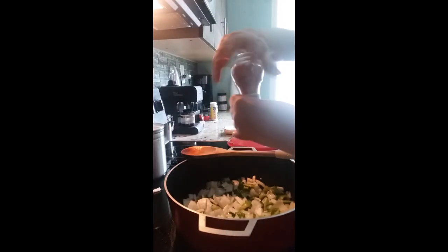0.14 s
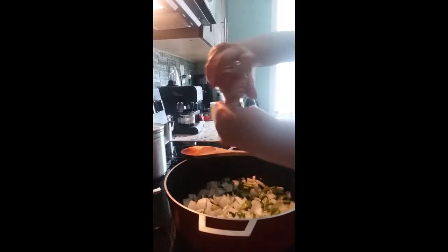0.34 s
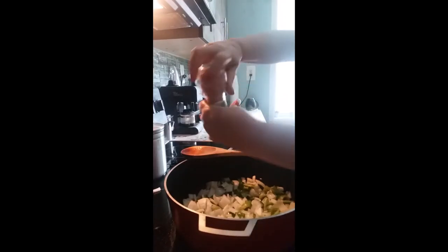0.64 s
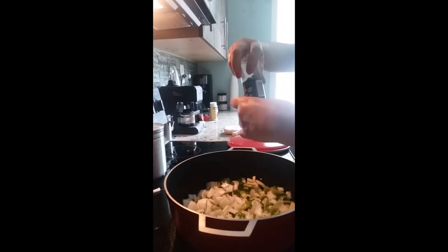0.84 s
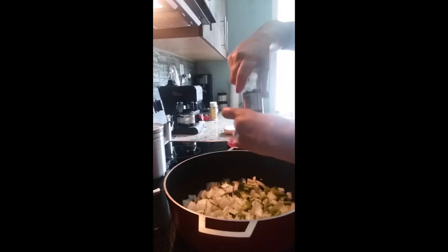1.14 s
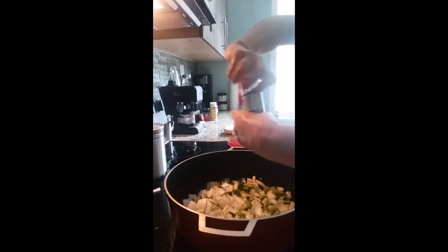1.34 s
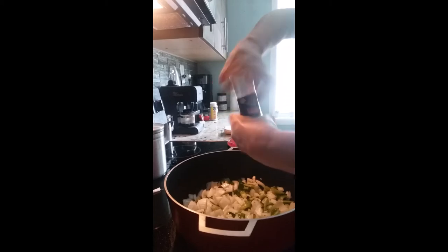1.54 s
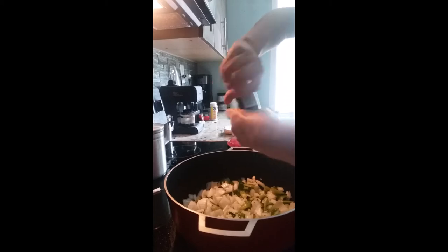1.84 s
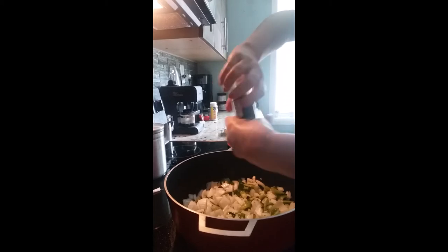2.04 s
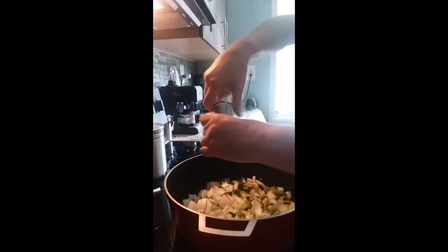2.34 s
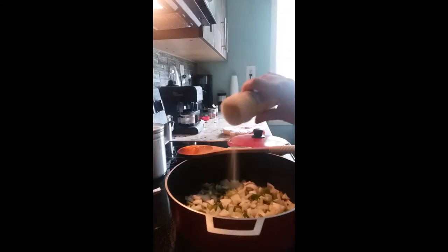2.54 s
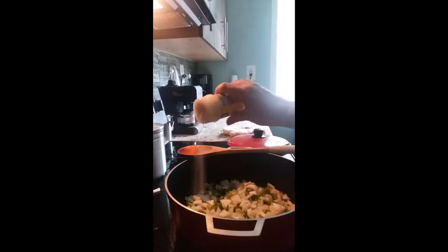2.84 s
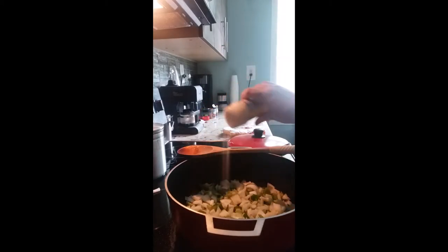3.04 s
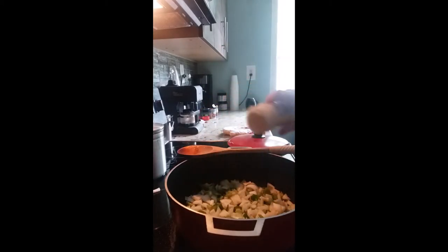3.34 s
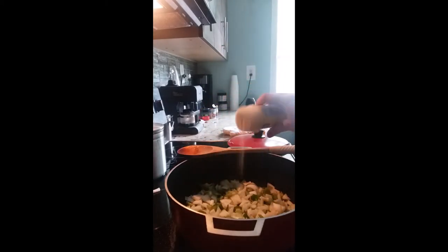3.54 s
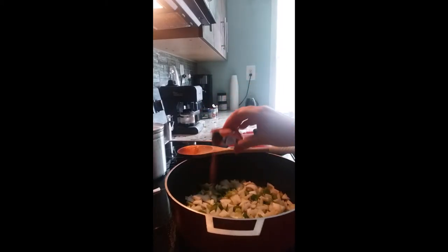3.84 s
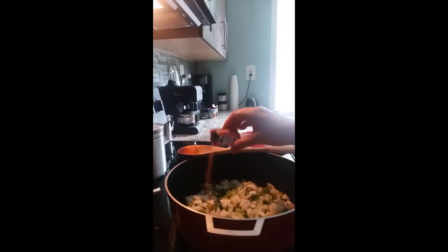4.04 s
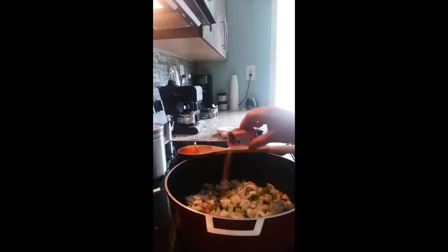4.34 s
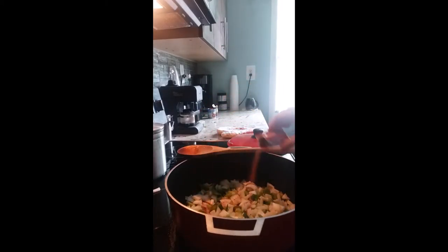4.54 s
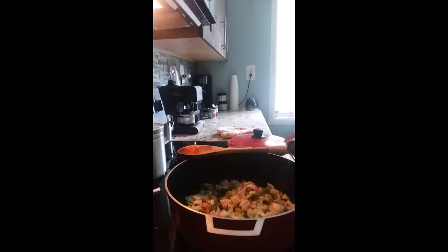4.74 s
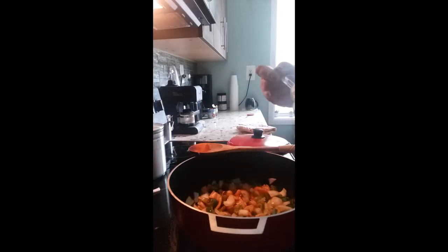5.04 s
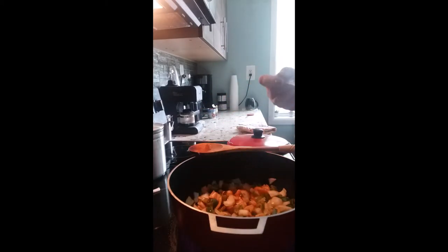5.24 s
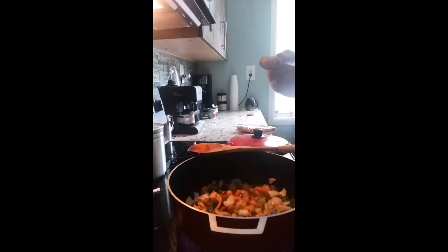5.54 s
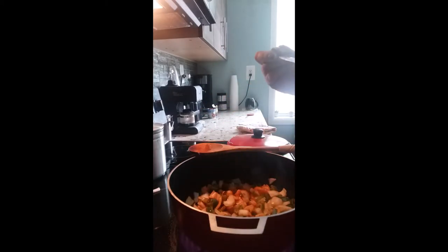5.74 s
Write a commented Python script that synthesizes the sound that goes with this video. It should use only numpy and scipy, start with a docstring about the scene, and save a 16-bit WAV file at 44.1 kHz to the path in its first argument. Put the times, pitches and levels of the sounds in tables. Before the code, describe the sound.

A home kitchen is heard from near the stove, with a low room rumble, an extractor fan's steady hum and a soft sizzle throughout. From the start to about 0.75 seconds, a salt mill makes five quick, dry, gritty twists. From 1.1 to 2.4 seconds, a louder pepper mill makes seven turns, seeds crunching and cracking sharply in its hollow body, with a slight room echo. Loose seeds rustle faintly between the later turns, and there is a small hollow knock near 1.9 seconds. At 2.5 seconds the grinding is over and the sizzle, hum and rumble rise. Little pops of fat tick through the frying, thickest between 3.1 and 3.6 seconds. At 5 seconds the sizzle turns faint and a deeper motor drones until the end, near 6 seconds. The whole sound dips very briefly at about 0.8, 2.5, 3.8 and 5 seconds.

```python
"""Spices are added to a pot in a home kitchen, in five shots joined by short fades.
Room rumble, an extractor fan's hum and a soft sizzle run throughout. A hand mill is twisted at once,
a second, louder one from 1.1 s: seeds crunch and crack under the burr and ring the hollow body.
From 2.5 s the mills rest and the pot sizzles louder, with bubbles of fat popping.
At 5 s the sizzle drops back and a deeper motor drones."""
import sys
import numpy as np
from scipy import signal
from scipy.io import wavfile
from scipy.ndimage import uniform_filter1d

SR = 44100
rng = np.random.default_rng(int(sys.argv[2]) if len(sys.argv) > 2 else 0)


def dump_mix(stems):
    """Bounce the given channels to the path in sys.argv[1] as a 16-bit WAV at rate SR."""
    frames = np.atleast_2d(stems).T  # one column per channel
    limited = np.clip(frames, -1, 1)  # hard clip at full scale
    pcm = np.round(limited * 32767).astype(np.int16)
    wavfile.write(sys.argv[1], SR, pcm)


N = 259749
T = np.arange(N) / SR


def gain_of(db):
    return 10 ** (np.asarray(db) / 20)


def unit_rms(x):
    return x / np.sqrt(np.mean(x ** 2) + 1e-20)


def curve_at(points, hz):
    f, value = np.transpose(points)
    return np.interp(np.log(hz + 1), np.log(f + 1), value)


def peaks_db(modes, hz):
    return sum(db / (1 + (2 * (hz - f) / width) ** 2) for f, width, db in modes)


def wander(rate_hz):
    """Slow random drift up to rate_hz, unit RMS."""
    hz = np.geomspace(0.0454 * rate_hz, rate_hz, num=16)[:, None]
    coarse = np.sin(2 * np.pi * (hz * T[::64] + rng.random(hz.shape))).sum(axis=0)
    return np.interp(T, T[::64], unit_rms(coarse))


def diffuse(colour, size, patchy_db, spacing_m=0.089, balance=((0, 0), (1, 0))):
    """Patchy noise from all sides: two microphones agree only on long waves."""
    hz = np.fft.rfftfreq(size, 1 / SR)
    a, b, c, d, patches = rng.standard_normal((4 * N // size + 5, len(hz), 5)).T
    patches = unit_rms(uniform_filter1d(uniform_filter1d(patches, size=10, axis=0), size=6, axis=1))
    coherence = np.sinc(2 * hz * spacing_m / 343)[:, None]
    left = a + 1j * b
    spectra = np.array([left, coherence * left + np.sqrt(1 - coherence ** 2) * (c + 1j * d)])
    side_db = np.multiply.outer([.5, -.5], curve_at(balance, hz))
    spectra *= gain_of((colour(hz) + side_db)[..., None] + patchy_db * patches)
    return unit_rms(signal.istft(spectra, nperseg=size, noverlap=3 * size // 4)[1][:, :N])


def coloured(x, colour):
    """Minimum-phase, unit-energy filter shaped by colour(hz) in dB."""
    hz = abs(np.fft.fftfreq(4096, 1 / SR))
    log_gain = np.log(gain_of(np.maximum(colour(hz), -100)))
    taps = np.fft.ifft(np.exp(np.conj(signal.hilbert(log_gain)))).real[:2048]
    return signal.oaconvolve(x, taps[None] / np.linalg.norm(taps), axes=1)[:, :N]


# Each row: shot start in seconds, then rumble, fan and sizzle levels in dB.
SHOTS = [(0, -57.5, -62, -61), (.771, -58.5, -63, -60.5), (2.533, -52, -59, -53),
         (3.766, -52.5, -58, -55.5), (5.032, -57.5, -64, -68)]

def shot_gain(layer):
    rows = np.array(SHOTS)
    column = 1 + ["rumble", "fan", "sizzle"].index(layer)
    return gain_of(rows[np.searchsorted(rows[1:, 0], T), column])


# Each row: frequency in Hz, spectral density in dB.
RUMBLE_SPECTRUM = [(40, -54), (85, -30), (96, -12.5), (200, -4.5), (312, -4.5), (370, -5), (600, -8.5),
                   (820, -11), (1300, -14), (1600, -18.5), (2500, -21.5), (4000, -30.5)]
# Each row: frequency in Hz, left minus right in dB.
RUMBLE_BALANCE = [(60, 5), (110, -1.5), (200, -2), (380, 0.5), (700, -9.5), (1290, -2), (2380, 2.5),
                  (4400, -9), (8120, 7), (15000, -2)]
# Each row: centre in Hz, width in Hz, boost in dB.
ROOM_MODES = [(96.3, 12, 13), (140, 9.4, 8), (185.8, 19.3, 12), (229.8, 5.2, 8.5), (276, 44, 5.5),
              (504, 14, 4.5)]

def room_rumble():
    """Rumble gathers in the room's low modes."""
    colour = lambda hz: curve_at(RUMBLE_SPECTRUM, hz) + peaks_db(ROOM_MODES, hz)
    return shot_gain("rumble") * diffuse(colour, size=4096, patchy_db=1.75, balance=RUMBLE_BALANCE)


def motor_tone(hz, db, waver_db):
    """A steady pitch whose level wavers."""
    level = np.sqrt(2) * gain_of(db + waver_db * wander(rate_hz=6))
    return level * np.sin(2 * np.pi * (hz * T + rng.random()))


def extractor_fan():
    """The fan hums on three tones, louder on the right."""
    hum = motor_tone(317.8, -2.5, 2.73) + motor_tone(635.7, -13, 2) + motor_tone(689.8, -8.5, 2.7)
    return shot_gain("fan") * hum * gain_of([[-2.5], [1.5]])


# Each row: frequency in Hz, spectral density in dB.
SIZZLE_SPECTRUM = [(600, -24), (900, -17), (1600, -2.5), (3000, -1.5), (5000, -2), (7500, -3),
                   (10000, -6.5), (12500, -12.5), (15800, -12.5)]
# Resonances that colour the sizzle. Each row: centre in Hz, width in Hz, gain in dB.
SIZZLE_MODES = [(2114, 84, 3.5), (3070, 150, 2), (3460, 200, -11), (3800, 200, 3), (4460, 250, -3.5),
                (5040, 330, 5), (6300, 980, 4)]

def sizzle(bursts_per_s=400):
    """Hot food gives a fine hiss and a spatter of tiny bursts. Both are heard with the same colour: a lift near
    5 kHz and a dip near 3.5 kHz."""
    colour = lambda hz: curve_at(SIZZLE_SPECTRUM, hz) + peaks_db(SIZZLE_MODES, hz)
    hiss = diffuse(colour, size=1024, patchy_db=2.0)
    bursts = gain_of(1.5 * np.minimum(rng.exponential(1, N), 4)) * (rng.random(N) < bursts_per_s / SR)
    puff = rng.standard_normal((2, 400)) * gain_of(-60 * T[:400] / 0.0053)
    spatter = unit_rms(coloured(signal.oaconvolve(bursts[None], puff, axes=1), colour))
    return shot_gain("sizzle") * gain_of(0.45 * wander(rate_hz=6.6)) * (hiss + gain_of(-7) * spatter)


# Each row: start, rise and hold in seconds, peak drive in dB, low and treble offsets in dB.
TWISTS = [(0.071, .003, 0.04, -47, -0.5, 5), (0.243, 0.046, .003, -48.5, 2, 5),
          (0.397, 0.011, 0.054, -52.5, -1, 6), (0.55, 0.035, .008, -47.5, -1, 3.5),
          (0.696, 0.037, .012, -44.5, -6, 2), (1.087, 0.015, 0.0027, -38.5, 0, 6),
          (1.235, 0.012, 0.0028, -36.5, -3, -2), (1.432, 0.025, 0.047, -33.5, 2.5, 0.5),
          (1.688, 0.0014, 0.062, -33.5, -1.5, 1), (1.922, 0.023, 0.039, -37.5, 0, 2.5),
          (2.132, 0.03, 0.025, -39, -3, 1.5), (2.35, 0.016, 0.029, -34, -1.5, -1)]

def twists(bite_db=-10, sag_db_per_s=-170, let_go_s=0.015, let_go_db=-11.5,
           trickle_s=0.055, trickle_db=-12.5):
    """Grit envelopes: the burr bites, peaks, the wrist slackens and lets go, crumbs trickle."""
    for start, rise, hold, db, low_db, treble_db in TWISTS:
        times = start + np.cumsum(np.maximum([0, rise, hold, let_go_s, trickle_s], 1e-4))
        middle = db + np.cumsum([bite_db, -bite_db, sag_db_per_s * hold, let_go_db, trickle_db])
        low = middle + low_db + [-3.5, 0, 0, 0, 0]  # the low ring needs full load
        treble = middle + treble_db + [0, 0, 0, 0, -4]  # the trickle goes dull
        yield times, [low, middle, treble]


def grit(band_db=(0.5, -8, 0)):
    """Seeds give way in clumps: noise that drives the mill's low, middle and treble bands."""
    bands = np.zeros((3, 2, N))
    clumps = gain_of(1.9 * unit_rms(uniform_filter1d(rng.standard_normal(N), size=90)))
    noise = unit_rms(clumps * rng.standard_normal(bands.shape)) * gain_of(band_db)[:, None, None]
    ticks = unit_rms(uniform_filter1d(rng.standard_normal(N), size=200))
    for envelopes, ticks_db in [(twists(), 0), (rustles(), 5)]:  # loose seeds tick more unevenly
        for times, levels_db in envelopes:
            gate = np.clip(np.minimum((T - times[0]) / 0.00039, (times[-1] - T) / 0.0027), 0, 1)
            gains = gain_of([np.interp(T, times, db) + ticks_db * ticks for db in levels_db])
            bands += gate * gains[:, None] * noise
    return bands


# Each row: start in seconds, drive in dB, low and treble offsets in dB on top of band_db.
CRACKS = [(0.0741, -39, -11, -1), (0.0886, -43, -6, -1), (0.1024, -40, -6, 0), (0.244, -39, -15, -4),
          (0.2506, -38.5, -8, -5), (0.263, -39, -11, -1), (0.2825, -41, -5, 0), (0.4077, -46, -10, -9),
          (0.443, -42, -8, -7), (0.5696, -43, 1, -6), (0.58, -38, -2, -15), (0.6988, -44, -13, -2),
          (0.712, -43, -7, -4), (0.7277, -45, -12, 1), (1.0893, -30.5, -1.5, -3.5), (1.1026, -33, -3, 3.5),
          (1.2369, -21.5, -14.5, -6.5), (1.2735, -35.5, -5, -9), (1.424, -43, -3, 2),
          (1.4406, -32.5, 5, -11), (1.4498, -22.5, 3, -0.5), (1.461, -32, -8, -6), (1.4692, -29, -9, 1),
          (1.481, -16.5, -3.5, -16), (1.4915, -22, -13, -11), (1.6912, -20, -6.5, 1), (1.714, -38, -2, -9),
          (1.7496, -35, -12, -11), (1.9254, -38, -10, -13), (1.9338, -27, -14, -8), (1.9518, -30, -2, -9),
          (1.9776, -37, -1, 0), (2.137, -34.5, -8, -5), (2.1574, -27.5, -4.5, -4),
          (2.1774, -28.5, -13, -7.5), (2.353, -40, -16, -9), (2.3678, -23.5, -3, 0.5), (2.398, -33, -9, -1)]

def cracks(t60_s=0.03, band_db=(6.5, 0, 10)):
    """A seed's shell snaps, then crumbles, driving the same three bands."""
    bands, t = np.zeros((3, 2, N)), T[:2500]
    snap = 1 + 0.67 * gain_of(-60 * t / 0.0083)
    envelope = snap * gain_of(-60 * t / t60_s) * np.minimum(t / 0.00066, 1)
    for start, db, low_db, treble_db in CRACKS:
        crack = envelope * rng.standard_normal((3, 2, len(t)))
        crack /= abs(crack).max(axis=2, keepdims=True)
        gains = gain_of(db + np.add(band_db, [low_db, 0, treble_db]))
        bands[..., round(start * SR):][..., :len(t)] += gains[:, None, None] * crack
    return bands


# Each row: frequency in Hz, spectral density in dB.
CRUNCH_SPECTRUM = [(300, -27), (620, -20.5), (1000, -23.5), (1500, -20.5), (2100, -13.5), (2600, -5),
                   (3100, -4), (5000, 0), (6600, -2), (8000, -2.5), (10800, -6), (13000, -9.5), (15800, -3)]

def mill_body(bands, modes, low_hz=4400, treble_hz=7000):
    """The hollow body's resonances colour the three bands of the drive."""
    colour = lambda hz: curve_at(CRUNCH_SPECTRUM, hz) + peaks_db(modes, hz)
    cut_db = lambda ratio: 10 * np.log10(1 + ratio ** 6)
    low = coloured(bands[0], lambda hz: colour(hz) - cut_db(hz / low_hz))
    middle = coloured(bands[1], lambda hz: colour(hz) - cut_db(low_hz / (hz + 1)) - cut_db(hz / treble_hz))
    treble = coloured(bands[2], lambda hz: colour(hz) - cut_db(treble_hz / (hz + 1)))
    return low + middle + treble


# Body resonances. Each row: centre in Hz, width in Hz, gain in dB.
SALT_MILL_MODES = [(4550, 180, 2.5), (5800, 130, 5), (6390, 150, 4), (8600, 220, 4), (9900, 300, 5),
                   (12700, 650, 5)]
PEPPER_MILL_MODES = [(1800, 110, 6.5), (2220, 120, -1), (2970, 110, 5.5), (3140, 80, 9), (3400, 92, 5),
                     (3750, 170, 0.5), (3994, 99, 3.5), (4240, 100, 4), (4910, 170, 2.5), (5460, 180, 4),
                     (7750, 300, 4), (8160, 400, 3.5)]

def mills():
    """Grit and cracks ring the salt mill in the first shot, the pepper mill after it."""
    drive = grit() + cracks()
    first = T < SHOTS[1][0]
    return mill_body(drive * first, SALT_MILL_MODES) + mill_body(drive * ~first, PEPPER_MILL_MODES)


def wall_echoes(x):
    """Hard walls return sparse echoes; the treble rings longest."""
    taps = np.zeros((2, SR // 2))
    arrivals = np.arange(100, SR // 2 - 20, 20) + rng.integers(0, 20, (2, (SR // 2 - 101) // 20))
    np.put_along_axis(taps, arrivals, rng.choice([-1., 1.], arrivals.shape), axis=1)
    hz, t, spectra = signal.stft(taps, SR, nperseg=256)
    t60_s = curve_at([(1000, 0.17), (4000, 0.31), (15000, 0.34)], hz)[:, None]
    tail = signal.istft(spectra * gain_of(-60 * t / t60_s), SR, nperseg=256)[1]
    return signal.fftconvolve(x.mean(axis=0)[None], tail / np.linalg.norm(tail[0]), axes=1)[:, :N]


# Each row: start in seconds, length in seconds, drive in dB.
RUSTLES = [(1.612, 0.043, -61), (1.87, .047, -60.5), (2.086, 0.042, -57.5), (2.298, 0.029, -60.5)]

def rustles(swell_db=2, low_db=-18, treble_db=6):
    """Grit envelopes: the hand turns back and loose seeds shuffle, thin and bright."""
    for start, length, db in RUSTLES:
        middle = db + np.array([0, swell_db])
        yield [start, start + length], [middle + low_db, middle, middle + treble_db]


# Each row: start in seconds, level in dB, pitch in Hz.
KNOCKS = [(1.934, -45.5, 677)]

def knocks(rise_s=0.0038, t60_s=0.083):
    """The mill's head knocks with a short hollow ring."""
    out, t = np.zeros(N), T[:4000]
    for start, db, hz in KNOCKS:
        envelope = gain_of(db - 60 * t / t60_s) * np.minimum(t / rise_s, 1)
        out[round(start * SR):][:len(t)] += envelope * np.sin(2 * np.pi * hz * t)
    return out


# Each row: start in seconds, level in dB, nominal pitch in Hz.
FAT_POPS = [(2.789, -36, 7500), (3.1512, -36.5, 5700), (3.1994, -40, 5210), (3.3566, -42, 5840),
            (3.414, -33, 5840), (3.4762, -39.5, 4960), (3.4902, -34.5, 5000), (3.553, -36.5, 4860),
            (4.19, -44, 4870), (4.369, -41.5, 3820), (4.459, -39, 5330), (4.7495, -39.5, 3240),
            (4.9264, -41, 4860)]

def fat_pops(tick_t60_s=0.006, fizz_t60_s=0.05):
    """Larger bubbles of fat burst: a tick, then a fizz."""
    out, t = np.zeros((2, N)), T[:1200]
    envelope = gain_of(-6 - 60 * t / tick_t60_s) + gain_of(-14 - 60 * t / fizz_t60_s)
    for start, db, hz in FAT_POPS:
        band = signal.butter(2, [.4 * hz, 1.4 * hz], "bandpass", fs=SR)
        puff = unit_rms(signal.lfilter(*band, rng.standard_normal((2, len(t)))))
        out[:, round(start * SR):][:, :len(t)] += gain_of(db) * envelope * puff
    return out


def motor_drone():
    """A deeper motor sounds two tones in the last shot."""
    return (T > SHOTS[-1][0]) * (motor_tone(161.2, -49, 0.67) + motor_tone(239.7, -63.5, 2.6))


def scene():
    grinding = mills()
    spices = grinding + gain_of(-8) * wall_echoes(grinding) + knocks()
    return spices + sizzle() + fat_pops() + room_rumble() + extractor_fan() + motor_drone()


# Microphone self-noise. Each row: frequency in Hz, spectral density in dB.
MIC_NOISE = [(20, -28), (100, -9.5), (1000, -25), (5000, -27), (16000, -29)]

def record(dry):
    """The microphones add their own noise; each cut fades almost to silence and back; a low-pass ends it."""
    noise = diffuse(lambda hz: curve_at(MIC_NOISE, hz), size=2048, patchy_db=5.0, spacing_m=1.4)
    to_cut_s = np.min([abs(T - shot[0]) for shot in SHOTS[1:]], axis=0)
    fade = gain_of(-24) + np.sin(np.pi / 2 * np.clip((to_cut_s - .006) / 0.03, 0, 1)) ** 2.6
    lowpass = signal.firwin(511, cutoff=15760, window=("kaiser", 9), fs=SR)
    return signal.oaconvolve((dry + gain_of(-69) * noise) * fade, lowpass[None], "same")


dry = scene()
out = record(dry)
dump_mix(out)
```